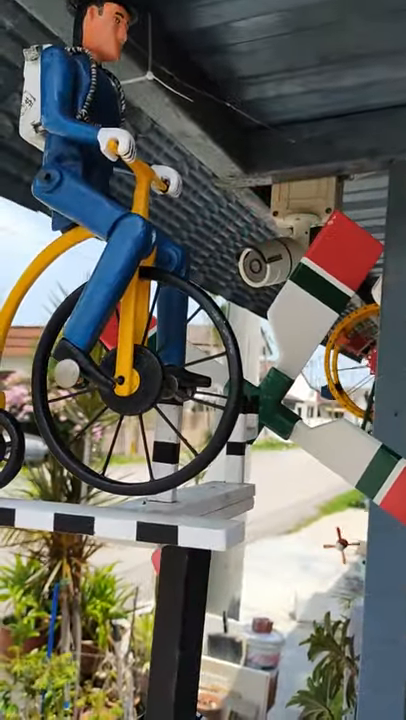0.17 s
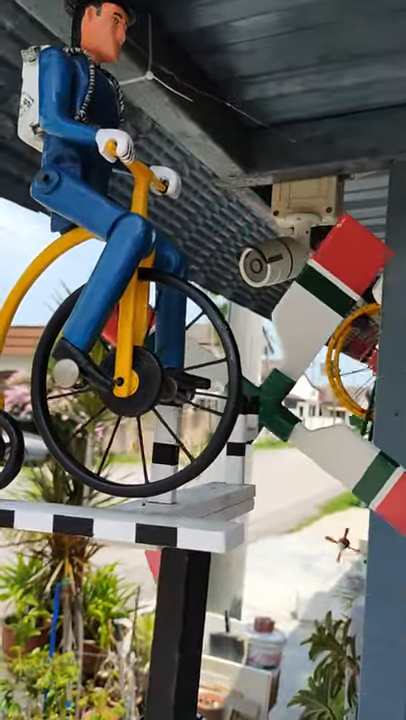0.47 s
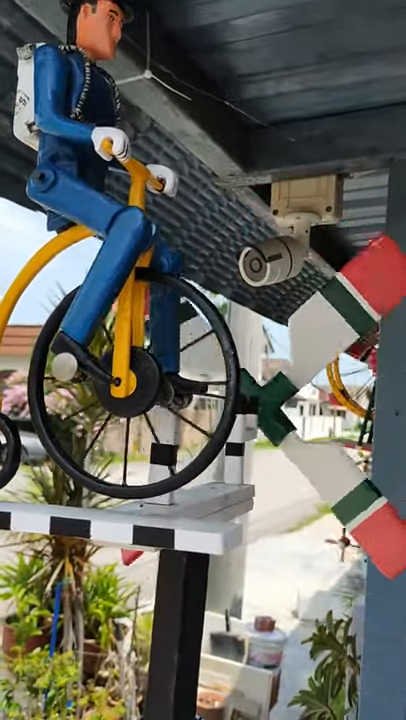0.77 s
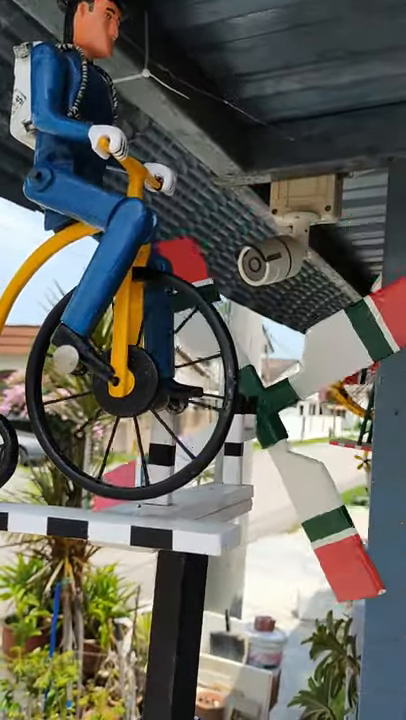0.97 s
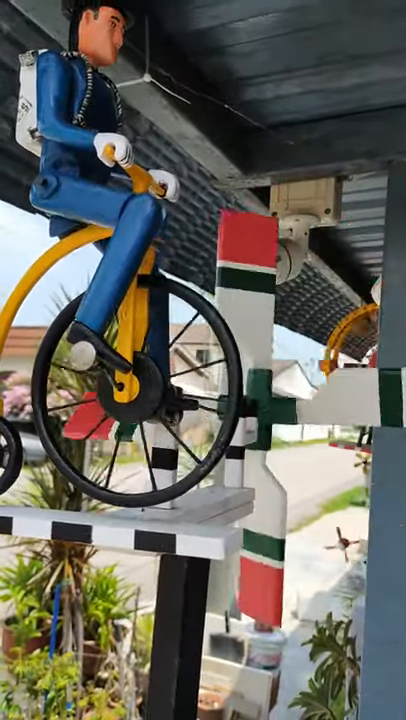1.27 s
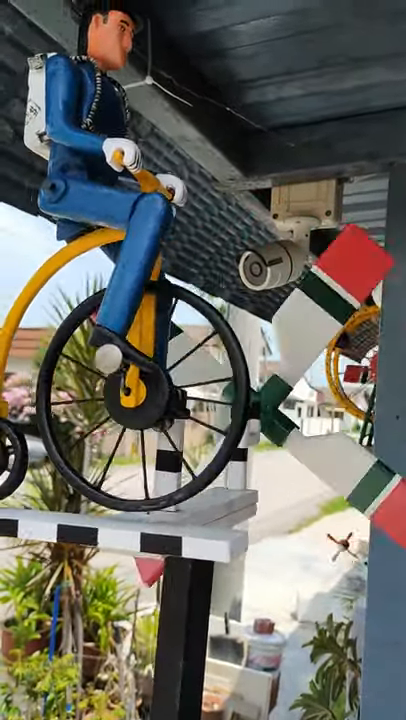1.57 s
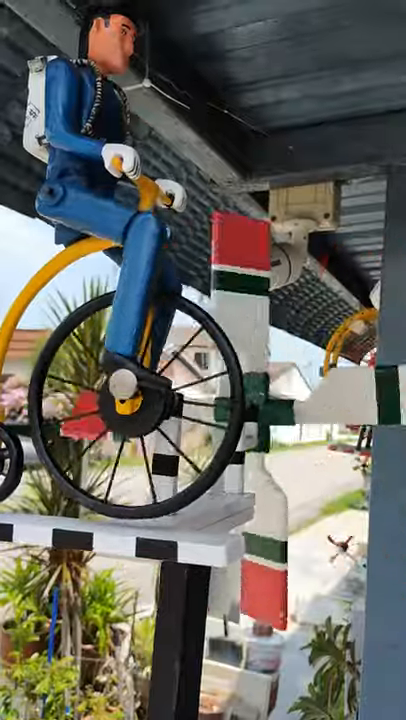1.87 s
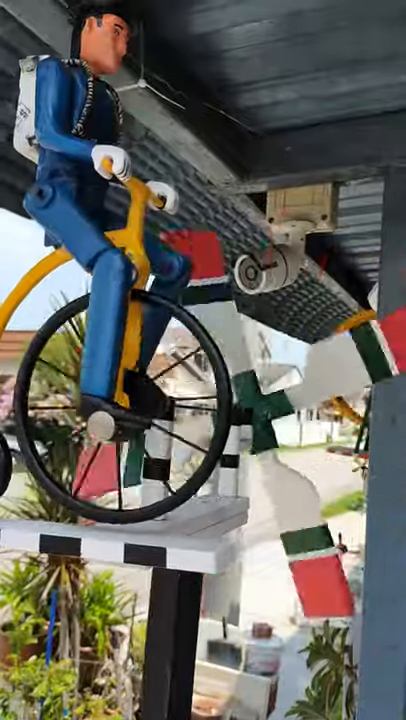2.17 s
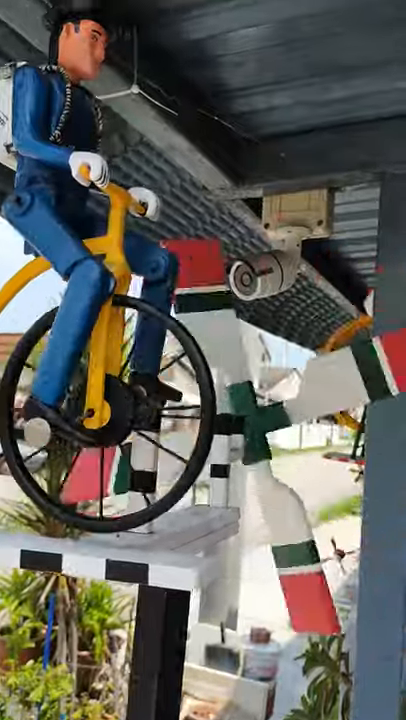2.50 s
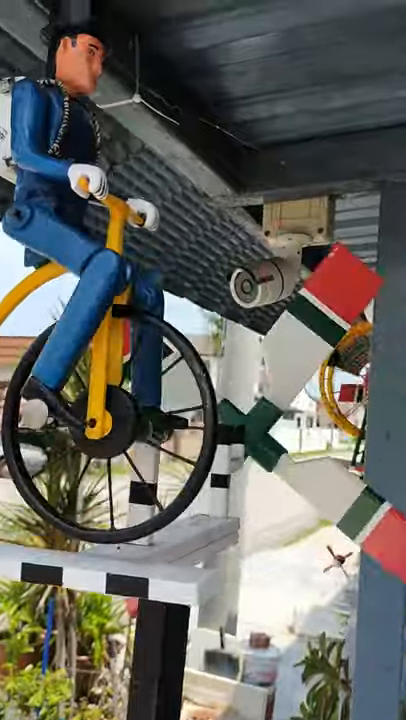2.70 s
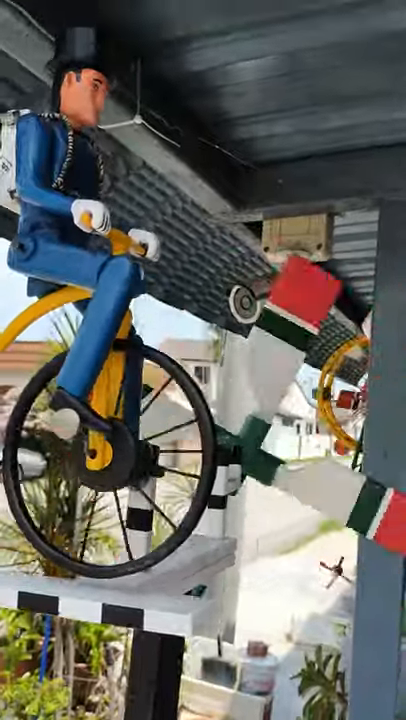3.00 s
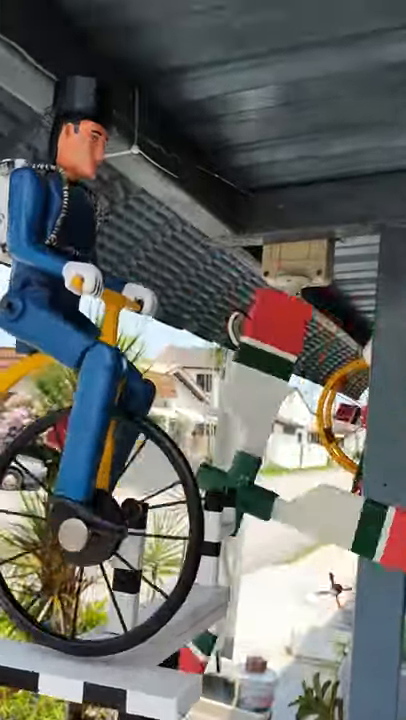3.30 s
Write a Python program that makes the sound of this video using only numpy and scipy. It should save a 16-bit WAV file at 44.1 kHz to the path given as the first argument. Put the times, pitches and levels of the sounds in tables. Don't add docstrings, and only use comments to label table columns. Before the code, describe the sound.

A wooden whirligig clatters close by under a porch roof. From 0 to 0.6 s, quick dry knocks cluster; then brittle clacks come roughly every quarter second, with light ticks, bouncing chatter, short woody tails and faint metallic rings. Low wind buffets grow from 0.5 s, overload heavily around 2.0-2.4 s, then fade by 3 s, leaving rattles over soft hiss and a barely audible thin bearing whistle.

```python
import sys
import numpy as np
from scipy import signal
from scipy.fft import rfft, irfft, next_fast_len
from scipy.io import wavfile
from scipy.ndimage import uniform_filter1d

SR = 44100
rng = np.random.default_rng(int(sys.argv[2]) if len(sys.argv) > 2 else 0)


def to_linear_factor(level_db):
    exponent = np.asarray(level_db, float) / 20
    return 10 ** exponent


def generate_wav(sig):
    pcm = np.round(np.clip(np.atleast_2d(sig).T, -1, 1) * 32767).astype(np.int16)
    wavfile.write(sys.argv[1], SR, pcm)


N = 152145

# (time [s], bright peak level [dB], wood body level [dB])
CRANK_KNOCKS = [(0.054, -31.5, -42.5), (0.064, -30, -41.5), (0.076, -29, -53), (0.185, -25, -59),
                (0.2435, -38, -49), (0.403, -21.5, -43), (0.595, -26.5, -39.5), (0.8972, -23, -41.5),
                (1.0878, -24.5, -41), (1.25, -33, -45), (1.3567, -23, -40.5), (1.522, -30, -65),
                (1.5537, -21, -39), (1.8386, -21, -39), (2.0388, -21.5, -40.5), (2.2, -33.5, -51.5),
                (2.3256, -21.5, -39), (2.5316, -23.5, -42), (2.575, -29, -57), (2.6195, -37, -44),
                (2.827, -21.5, -42.5), (2.865, -33, -46), (3.046, -20.5, -41), (3.226, -37, -47.5),
                (3.35, -29, -48.5), (3.36, -29, -45), (3.3844, -31, -48.5)]
BODY_RISE_S, BODY_T60_S = 0.0027, 0.25


def rms_one(x):
    return x / np.sqrt(np.mean(x ** 2) + 1e-20)


def drift(rate_hz):
    r = np.exp(-80 * np.pi * rate_hz / SR)
    settle = 2000
    noise = rng.standard_normal(N // 40 + settle + 2)
    slow = signal.lfilter([1], [1, -2 * r, r * r], noise)[settle:]
    return np.interp(np.arange(N) / 40, np.arange(len(slow)), rms_one(slow - slow.mean()))


def coloured(x, spectrum):
    hz, db = np.transpose(spectrum)
    size = next_fast_len(N + SR) // 2 * 2
    log_f = np.log(np.maximum(np.arange(size // 2 + 1) * SR / size, 1))
    outside = np.maximum(np.log(hz[0]) - log_f, 0) + np.maximum(log_f - np.log(hz[-1]), 0)
    level_db = np.maximum(np.interp(log_f, np.log(hz), db) - 40 * outside, -120)
    cepstrum = irfft(level_db * np.log(10) / 20, size)
    cepstrum[1:size // 2] *= 2
    cepstrum[size // 2 + 1:] = 0
    response = np.exp(rfft(cepstrum))
    gain = rms_one(to_linear_factor(level_db)).max() / to_linear_factor(level_db).max()
    return irfft(rfft(x, size) * gain * response, size)[:N]


def envelope(s, db, t60, rise_s=0., hold_s=None):
    out = np.full(N, 1e-9)
    for k in range(len(s)):
        first = int(s[k] * SR)
        hold = 0 if hold_s is None else max(hold_s[k], 0)
        since = np.arange(min(N - first, int((hold + t60) * SR))) / SR
        rise = 1 - np.exp(-(since + 1e-4) / (rise_s + 1e-5))
        shape = rise * to_linear_factor(db[k] - 60 * np.maximum(since - hold, 0) / t60)
        span = slice(first, first + len(since))
        out[span] = np.hypot(out[span], shape)
    return out


def resonate(x, hz, width_hz):
    r = np.exp(-np.pi * width_hz / SR)
    poles = [1, -2 * r * np.cos(2 * np.pi * hz / SR), r * r]
    return signal.lfilter([1, 0, -1], poles, x) * np.sqrt((1 - r * r) / 2)


def clicks(per_s, spread_db):
    sizes = to_linear_factor(spread_db * np.minimum(rng.exponential(1, N), 4)) * rng.choice([-1, 1], N)
    return rms_one(sizes * (rng.random(N) < per_s / SR))


def evened(x):
    window_s, share = 0.0376, 0.43
    power = uniform_filter1d(x ** 2 + .01, int(window_s * SR))
    return rms_one(x / power ** (share / 2))


def wind():
    # (time [s], level [dB])
    push_line = [
        (0.0, -43.5),
        (1.02, -32),
        (1.12, -36.5),
        (2.14, -32),
        (3.45, -46),
    ]
    # (time [s], peak level [dB], hold [s])
    buffets = [(0.191, -40, 0.0086), (0.232, -38.5, 0.016), (0.37, -33.5, 0.024), (0.468, -31, 0.014),
               (0.518, -28.5, 0.01), (0.616, -47, 0.063), (0.731, -24.5, 0.032), (0.827, -20.5, 0.014),
               (.94, -30, 0.015), (0.98, -25, 0.053), (1.073, -25, 0.027), (1.245, -31, 0.042),
               (1.384, -22, 0.078), (1.524, -29, 0.099), (1.596, -16.5, 0.023), (1.672, -24, 0.029),
               (1.853, -27, 0.0088), (1.983, -15.5, 0.062), (1.997, -6, 0.036), (2.039, -8, 0.032),
               (2.132, -11.5, 0.025), (2.179, -19, 0.031), (2.275, -15.5, 0.018), (2.322, -22, 0.048),
               (2.384, -7.5, 0.012), (2.545, -22, 0.022), (2.571, -20, 0.014), (2.641, -27, 0.0072),
               (2.771, -33, 0.024), (2.815, -20, 0.014), (2.966, -35.5, 0.01), (3.05, -49, 0.0097),
               (3.101, -40.5, 0.0075), (3.148, -43.5, 0.023)]
    # (time [s], peak level [dB])
    thumps = [(0.188, -46.5), (0.244, -43.5), (.393, -42), (0.493, -36), (.598, -50), (.632, -44),
              (.853, -23.5), (0.955, -36.5), (1.01, -37), (1.28, -38), (2.357, -33), (2.583, -27.5),
              (2.973, -51), (3.115, -44.5), (3.175, -43), (0.474, -38), (0.531, -27), (0.75, -35.5),
              (0.84, -22), (1.095, -26.5), (1.202, -48), (1.251, -32.5), (1.362, -36.5), (1.407, -21),
              (1.42, -25), (1.496, -29.5), (1.609, -19), (1.658, -21), (1.695, -30), (1.83, -38),
              (1.865, -21), (1.979, -20.5), (2.017, -11.5), (2.082, -17.5), (2.152, -20), (2.185, -18.5),
              (2.274, -11.5), (2.285, -14.5), (2.313, -13.5), (2.402, -14), (2.534, -28), (2.664, -28),
              (2.824, -27.5)]
    # (time [s], half length [s], depth [dB])
    lulls = [
        (.145, 0.02, -14),
        (.33, 0.017, -5),
        (1.144, 0.036, -7),
        (1.767, 0.012, 0),
        (3.015, 0.037, -7),
    ]
    # (frequency [Hz], level [dB per Hz])
    push_colour = [(20, 4.5), (45, 0), (80, -5), (130, -17), (220, -27.5)]
    # (frequency [Hz], level [dB per Hz])
    eddy_colour = [(30, -17.5), (80, 3), (160, 3), (300, -5), (500, -20), (800, -35.5), (1300, -45)]
    mean_db, opening_s, brighten_db_per_octave_per_db = -20.5, 0.015, 0.5067
    t = np.arange(N) / SR

    s, db, hold_s = np.transpose(buffets)
    force = envelope(s, db, t60=0.14, rise_s=0.014, hold_s=hold_s)
    thump_s, thump_db = np.transpose(thumps)
    slaps = np.zeros(N)
    slaps[((thump_s + .003) * SR).astype(int)] = to_linear_factor(thump_db + 21.5) * rng.choice([-1, 1], len(thumps))

    strength = force + envelope(thump_s, thump_db, t60=0.33, rise_s=0.0023)
    excess_db = np.clip(20 * np.log10(strength) - mean_db, -25, 12)
    excess_db = uniform_filter1d(excess_db, int(opening_s * SR))

    s, db = np.transpose(push_line)
    push_db = np.interp(t, s, db) + 4.5 + 0.12 * uniform_filter1d(excess_db, size=900)
    push = to_linear_factor(push_db + 1.0 * drift(3.3)) * evened(coloured(rng.standard_normal(N), push_colour))

    turbulence = clicks(per_s=140, spread_db=2.23) + 0.39 * rng.standard_normal(N)
    eddies = evened(coloured(turbulence, eddy_colour))
    lumps = to_linear_factor(-10.5) * force * eddies + coloured(slaps, eddy_colour)

    out = push
    for octave in range(6):
        edges_hz = [25 * 2 ** octave, 50 * 2 ** octave]
        band = signal.sosfiltfilt(signal.butter(1, edges_hz, "band", fs=SR, output="sos"), lumps)
        out = out + band * to_linear_factor(brighten_db_per_octave_per_db * (octave - 3) * excess_db)

    lull_db = sum(db * np.exp(-((t - s) / half_s) ** 4) for s, half_s, db in lulls)
    out = out * to_linear_factor(lull_db)
    top = 0.37
    return signal.sosfilt(signal.butter(4, 950, fs=SR, output="sos"), top * np.tanh(out / top))


def chatter():
    rub = clicks(per_s=1400, spread_db=1.8) + .5 * rng.standard_normal(N)
    return rms_one(rub * to_linear_factor(4.5 * drift(86)))


def hiss():
    # (frequency [Hz], level [dB per Hz])
    hiss_colour = [(150, -5), (250, -8), (547, -11), (2090, -6.5), (4570, -19), (7980, -16), (9330, -22.5),
                   (14900, -12), (16000, -8)]
    level_db = -52 + 0.36 * drift(12.0) + 1.03 * drift(25)
    return to_linear_factor(level_db) * coloured(rng.standard_normal(N) + 0.35 * chatter(), hiss_colour)


def snaps(s, db, count):
    bounce_s, bounce_loss_db = 0.0068, 1
    gaps = rng.uniform(0.15, 4.2, (len(s), count))
    at = s[:, None] + 0.00084 + bounce_s * (np.cumsum(gaps, axis=1) - gaps[:, :1])
    strength_db = db[:, None] + 3.5 - bounce_loss_db * np.arange(count) + rng.normal(0, 1.6, gaps.shape)
    out = np.zeros(N + SR)
    out[(at * SR).astype(int)] = to_linear_factor(strength_db) * rng.choice([-1, 1], gaps.shape)
    return out[:N]


def crank():
    # (time [s], bright peak level [dB], share in the wood [dB])
    ticks = [(0.04, -41, -13), (0.278, -35.5, -5), (0.3566, -37, -18), (0.7047, -40.5, 2),
             (0.744, -38, -4.5), (0.9184, -39, -12), (0.9584, -35, -4), (1.0629, -44, -5),
             (1.0818, -28.5, -3.5), (1.1038, -30.5, -10), (1.1214, -40, -6), (1.226, -31.5, -12),
             (1.268, -37, -9.0), (1.3684, -27, -9.0), (1.392, -31, -4), (1.479, -34, -16),
             (1.698, -36.5, -3), (1.72, -35, -7), (1.821, -32, -7), (1.8588, -29, -13), (1.8738, -38, -14),
             (1.9495, -35, -15), (2.0118, -38, -9.0), (2.11, -37.5, -1), (2.1823, -39, -1),
             (2.2513, -34.5, -12), (2.3988, -40, -3), (2.4783, -51, -19), (2.682, -41, -4),
             (2.7048, -34, -2), (2.764, -33, -8), (2.8076, -32.5, -7), (2.9302, -33, -7),
             (3.0209, -33, -22), (3.037, -26.5, -10), (3.121, -29.5, -12), (3.1961, -43, -7),
             (3.3277, -45, -6)]
    # (frequency [Hz], level [dB per Hz])
    crack_colour = [(8000, -13.5), (9500, -31.5), (11500, -9), (13000, -5.5), (15500, -3)]
    # (frequency [Hz], level [dB per Hz])
    chatter_colour = [(9500, -19), (12000, -11), (14000, -7), (15500, -2.5)]
    # (frequency [Hz], level [dB per Hz])
    body_colour = [(800, -2), (1650, 5), (2150, 4.5), (3000, -3), (3600, -17)]
    # (frequency [Hz], level [dB per Hz])
    upper_colour = [(2600, -9), (3400, 6), (4500, 4.5), (6500, 5.5), (8000, 0.5), (9400, -4)]
    crack_rise_s, crack_t60_s, tick_t60_s = 0.0038, 0.032, 0.03

    s, bright_db, body_db = np.transpose(CRANK_KNOCKS)
    tick_s, tick_db, share_db = np.transpose(ticks)
    crack_noise, body_noise, tail_noise = rng.standard_normal((3, N))
    loose = chatter()

    cracks = envelope(s, bright_db, crack_t60_s, crack_rise_s)
    cracks = cracks + envelope(tick_s, tick_db, tick_t60_s, crack_rise_s)
    bright = cracks * crack_noise
    bright = bright + to_linear_factor(-70) * clicks(per_s=72, spread_db=1.8)
    bright = bright + snaps(s, bright_db, count=5) + snaps(tick_s, tick_db, count=2)

    shake = envelope(s, body_db, BODY_T60_S, BODY_RISE_S) * (0.29 * loose + 0.79 * body_noise)
    shake = shake + envelope(tick_s, tick_db + share_db, tick_t60_s, crack_rise_s) * crack_noise
    shake = shake + envelope(s, body_db - 19.5, t60=0.72, rise_s=0.024) * tail_noise

    rattle_db = bright_db - 10.5 + 0.37 * (body_db - body_db.max())
    rattle = envelope(s, rattle_db, t60=0.29, rise_s=0.0035) * loose

    joints = to_linear_factor(-3.5) * (coloured(bright, crack_colour) + coloured(rattle, chatter_colour))
    return joints + to_linear_factor(-6) * coloured(shake, upper_colour) + to_linear_factor(-3) * coloured(shake, body_colour)


def rings():
    # (time [s], frequency [Hz], level [dB], width [Hz])
    loose_rings = [(0.044, 2520, -49, 100), (0.216, 2520, -53, 80), (0.06, 1650, -60, 90),
                   (0.184, 4810, -56, 30), (0.235, 4770, -60, 30), (0.29, 4880, -66, 30),
                   (.25, 1800, -57, 60), (.29, 2050, -54, 60), (.41, 1950, -47, 90), (.45, 2150, -53, 90),
                   (.60, 1570, -57.5, 80), (0.661, 630, -47, 50), (.876, 12700, -49, 60),
                   (.90, 5320, -50, 100), (.90, 2150, -47, 120), (0.944, 6440, -53.5, 300),
                   (1.10, 8200, -50, 300), (1.328, 12700, -49, 60), (1.356, 6500, -49.5, 500),
                   (1.354, 2100, -45.5, 150), (1.47, 1680, -54, 60), (1.555, 1650, -54, 99),
                   (1.719, 3000, -45, 500), (1.796, 12600, -59, 200), (2.33, 6580, -56, 300),
                   (2.39, 6600, -53, 250), (2.53, 5300, -47, 150), (2.635, 4840, -46.5, 620),
                   (2.759, 626, -48.5, 40), (2.861, 6550, -50.5, 293), (2.911, 450, -44.5, 29.8),
                   (3.028, 500, -53, 30), (3.047, 5150, -51, 200), (3.12, 460, -52, 30)]
    whistle_hz, whistle_db, from_s, to_s = 4005, -67.5, 2.3, 3.3
    t, noise = np.arange(N) / SR, rng.standard_normal(N)
    out = np.zeros(N)
    for s, hz, db, width_hz in loose_rings:
        tone = resonate(noise, hz, width_hz) + 0.53 * np.sin(2 * np.pi * hz * t)
        out = out + envelope([s], [db], t60=0.15, rise_s=0.0017) * tone
    out = out * to_linear_factor(-0.5 * drift(164))
    fade = np.clip((t - from_s) / 0.09, 0, 1) * np.clip((to_s - t) / .1, 0, 1)
    whistle = np.sin(2 * np.pi * whistle_hz * t + 0.51 * drift(5.8))
    return out + to_linear_factor(whistle_db + 1.3 * drift(15)) * fade * whistle


def wood():
    # (frequency [Hz], level [dB])
    modes = [(1620, -7), (2080, 2), (2400, -3), (2950, -6.5)]
    s, _, body_db = np.transpose(CRANK_KNOCKS)
    idle_db, patchy_db = -62, 2.5
    shake = (envelope(s, body_db - 17, BODY_T60_S, BODY_RISE_S) + to_linear_factor(idle_db)) * chatter()
    out = np.zeros(N)
    for hz, db in modes:
        out = out + to_linear_factor(db + patchy_db * drift(7.9)) * resonate(shake, hz, width_hz=44)
    return out / 3


def mottled(x):
    whole = rfft(x)
    hz = np.arange(N // 2 + 1) * SR / N
    place = 2 * np.log2(np.maximum(hz, 700) / 700)
    out = np.zeros(N)
    for k in range(11):
        piece = irfft(whole * np.maximum(1 - abs(place - k), 0), N)
        out = out + to_linear_factor(2 * drift(22.7)) * piece
    return out


def scene():
    return (mottled(crank() + hiss()) + wood() + rings() + wind())[None]


def band_limit(x):
    return signal.sosfilt(signal.butter(12, 16980, fs=SR, output="sos"), x)


def record(dry):
    x = signal.sosfilt(signal.butter(2, 18, "high", fs=SR, output="sos"), dry)
    x = signal.sosfilt(signal.ellip(12, .5, 55, 15850, fs=SR, output="sos"), x)
    return band_limit(x)


dry = scene()
out = record(dry)
generate_wav(out)
```